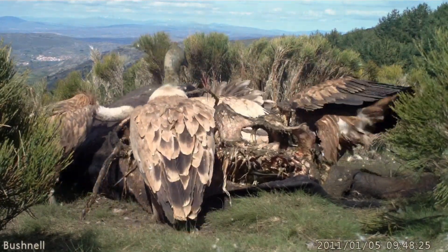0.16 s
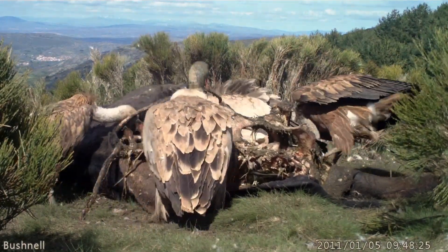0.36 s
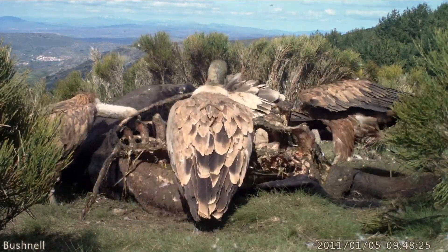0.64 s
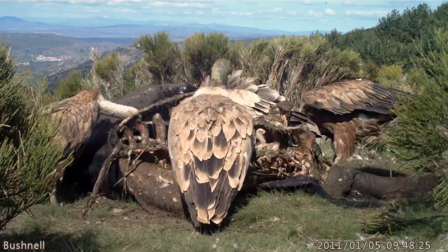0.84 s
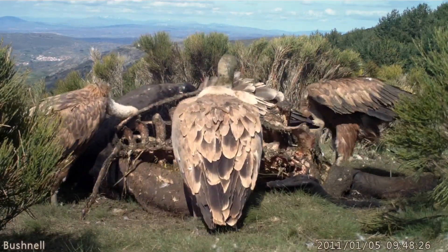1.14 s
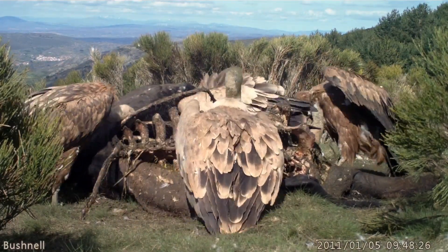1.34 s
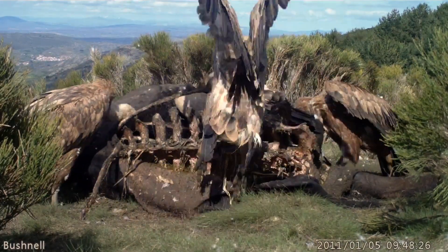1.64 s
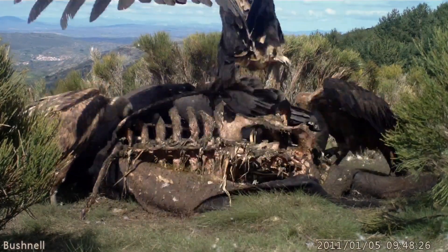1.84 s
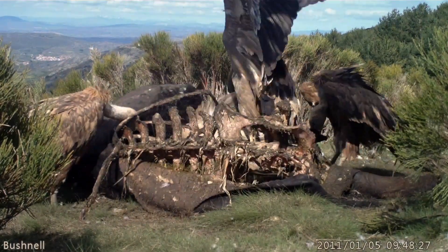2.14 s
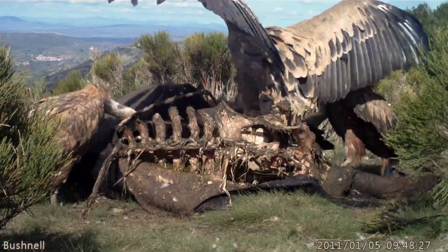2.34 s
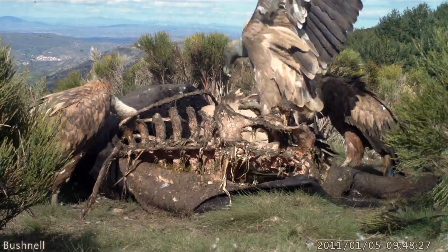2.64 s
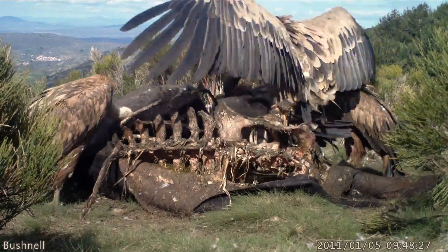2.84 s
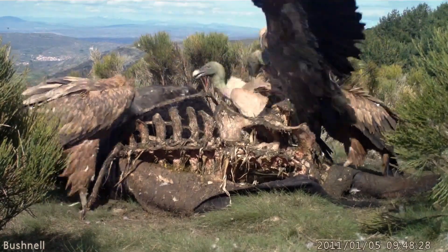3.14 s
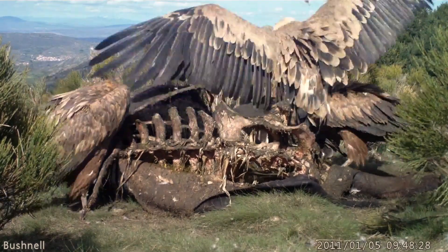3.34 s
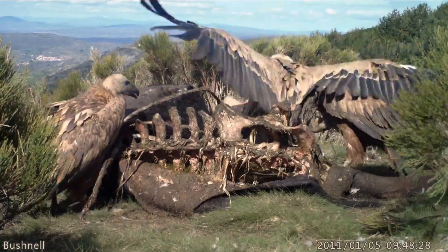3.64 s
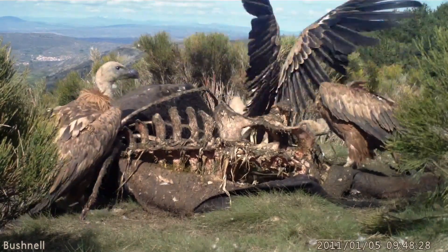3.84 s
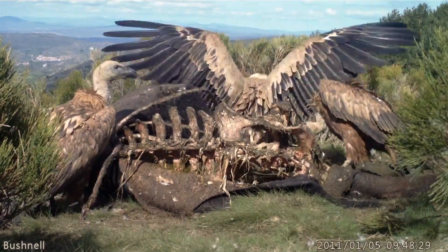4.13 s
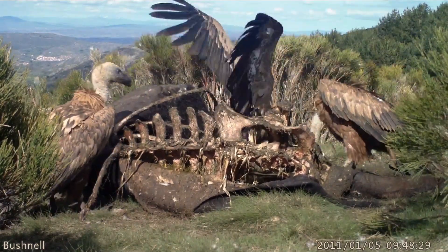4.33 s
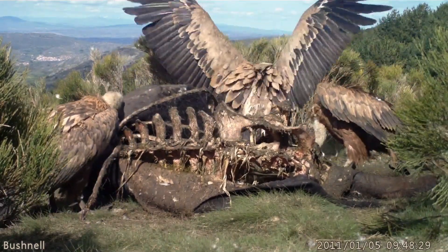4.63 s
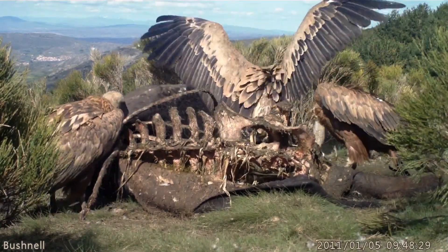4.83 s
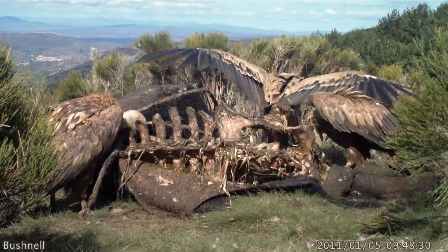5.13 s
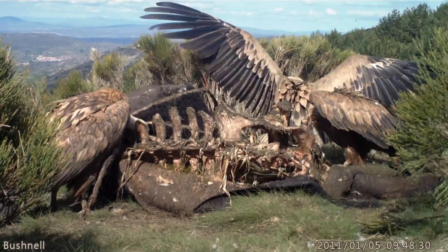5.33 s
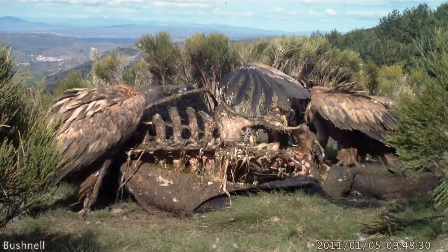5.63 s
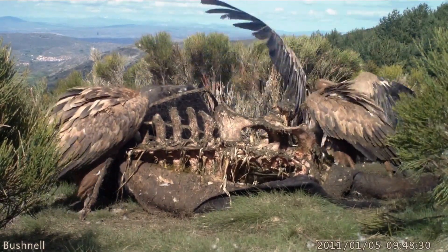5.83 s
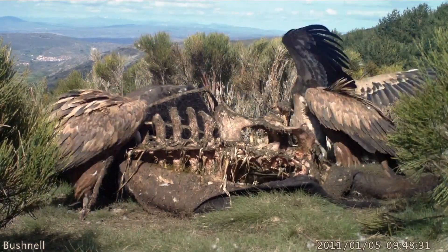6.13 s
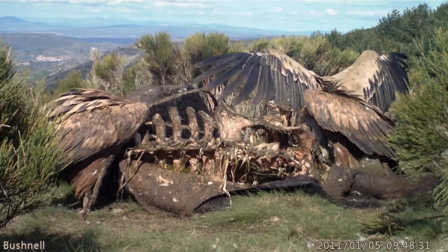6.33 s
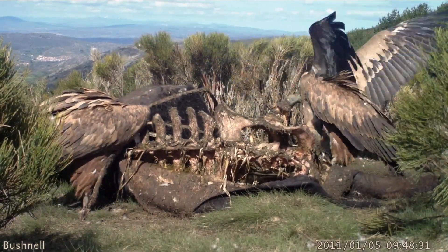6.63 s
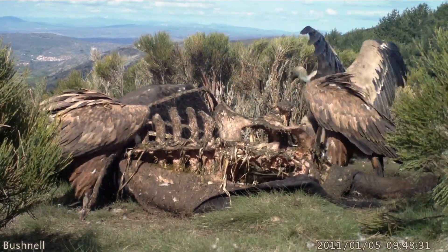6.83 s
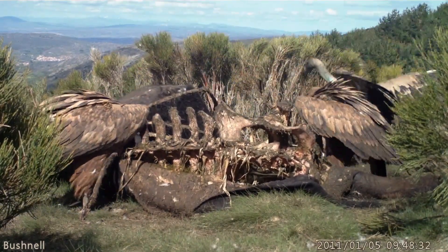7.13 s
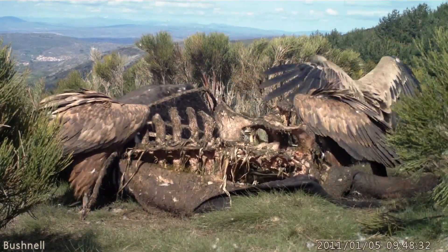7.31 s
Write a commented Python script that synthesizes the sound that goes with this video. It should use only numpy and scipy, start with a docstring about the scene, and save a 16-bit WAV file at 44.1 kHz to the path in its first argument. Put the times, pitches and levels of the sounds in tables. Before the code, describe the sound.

Large vultures quarrel at a carcass on a quiet open hillside. A long rattling hiss swells, turns into a wavering squeal and stops. Wing beats and a sharp snap follow, then a steady run of hoarse yelping cackles, loudest midway, fading and returning, ending with a drawn-out whine. Close, gritty low-quality microphone, birds only on the right; the left holds faint buzzing camera crackle.

```python
"""A long hiss tightens into a squeal, then runs of cackles break out among wing beats and sharp snaps.
Vultures squabble over a carcass on an open hillside, in front of a trail camera.
Breath noise and unsteady harmonics pass through throat, chest and beak filters to make the voices;
wings and ground are filtered noise, and snaps are short ringing tones with splintering noise.
The microphone feeds the right channel; the idle left one carries only the camera's electronics."""
import sys
import numpy as np
from scipy import signal
from scipy.fft import rfft, irfft, next_fast_len
from scipy.io import wavfile

SR = 44100
rng = np.random.default_rng(int(sys.argv[2]) if len(sys.argv) > 2 else 0)


def dump(signal):
    """Clip the signal to [-1, 1] and save it as 16-bit WAV at the path in sys.argv[1]."""
    limited = np.clip(np.atleast_2d(signal).T, -1, 1)
    pcm = np.round(limited * 32767).astype(np.int16)
    wavfile.write(sys.argv[1], SR, pcm)


N = 329427  # samples, about 7.5 s
TIME = np.arange(N) / SR  # seconds

# colour of the open beak, and of rustling feathers: [f/Hz, relative level/dB]
BEAK_COLOUR = [(2100, -24.5), (2700, 2), (3100, 8.5), (3380, 6), (3650, 6.5), (3950, 1.5), (4500, 3.5),
               (5000, -2), (5700, -14.5)]


def gain_of(db):
    """Turns decibels into an amplitude factor."""
    return 10 ** (np.asarray(db) / 20)


def evened(x):
    """Scales a sound to an average strength (rms) of 1."""
    return x / np.sqrt(np.mean(x ** 2) + 1e-20)


def add(mix, s, sound):
    """Mixes a sound in, starting at s seconds."""
    part = mix[max(round(s * SR), 0):][:len(sound)]
    part += sound[:len(part)]


def shaped(x, colour, hz=None, width=300, skirt=0.22):
    """Filters by a colour and, if hz is given, one resonance standing on a flat skirt; rms 1."""
    size = next_fast_len(len(x) + 1024)
    f = np.fft.rfftfreq(size, 1 / SR)
    at, db = np.transpose(colour)
    gain = gain_of(np.interp(np.log(f + 1), np.log(at), db))
    gain = gain / (1 + (f / at[-1] / 0.93) ** 8)  # fade above the last point
    gain = gain * f / (f + at[0] / 2)  # fade below the first point
    if hz is not None:
        gain = gain * (skirt + 1 / (1 + 2j * (f - hz) / width))
    return evened(irfft(rfft(x, size) * gain, size)[:len(x)])


def wobble(count, rate_hz):
    """Random drift: noise that keeps only changes slower than about rate_hz; rms 1."""
    size = next_fast_len(count + 8192)
    f = np.fft.rfftfreq(size, 1 / SR)
    slow = rfft(rng.standard_normal(size)) / (1 + (f / rate_hz) ** 4)
    return evened(irfft(slow, size))[:count]


def writes():
    """1 while the camera stores full buffers after a clock tick; two on one tick take twice as long."""
    # buffers filled at a steady pace: [first full t/s, filling time/s]
    buffers = [(0.15, 0.8 / 3), (0.246, 0.328)]
    clock_s, delay_s, write_s = 0.1, 0.0045, 0.0145
    # each filling time is rounded down to a clock tick
    full = [np.arange(first, N / SR, period) // clock_s for first, period in buffers]
    ticks = np.concatenate(full).astype(int)
    tick = (TIME // clock_s).astype(int)
    queued = np.bincount(ticks, minlength=tick[-1] + 1)[tick]
    since = TIME % clock_s - delay_s
    return (since > 0) * (since < queued * write_s)


def electronics(buzz_hz=708, frame_hz=30, crackle_db=-56, tick_db=-72, floor_db=-73, hum_db=-71,
                whine_db=-80):
    """Bursts of spiky buzz, a tick for every picture, and a thin floor of hiss, hum and whine."""
    # colour of crackle and ticks: [f/Hz, relative level/dB]
    crackle_colour = [(450, -59), (800, 10.5), (1400, 8.5), (5600, 8.5), (7500, 5.5), (10000, -4),
                      (12000, -80), (14500, 10), (16000, -38)]
    spikes = np.diff(np.floor(TIME * buzz_hz), prepend=0) * (1 + .5 * rng.standard_normal(N))
    grit = rng.standard_normal(N) * gain_of(3 * wobble(N, 1600))
    crackle = writes() * shaped(evened(spikes) + 0.69 * evened(grit), crackle_colour)

    since_frame = (TIME + .002) % (1 / frame_hz)
    tick_noise = grit * np.exp(-since_frame / 0.001) * gain_of(4 * wobble(N, 23.5))
    ticks = shaped(tick_noise, crackle_colour)

    floor_colour = [(60, 13.0), (500, 2.0), (2000, 10.5), (5000, 9.5), (9000, -2.5), (12000, -23)]
    floor = shaped(rng.standard_normal(N), floor_colour)
    hum = np.sin(2 * np.pi * 90 * TIME) + 0.75 * wobble(N, 130)
    high_tones = np.sin(2 * np.pi * 5185 * TIME) + 0.85 * np.sin(2 * np.pi * 6815 * TIME)
    high_tones = high_tones * (1 + .5 * wobble(N, 12))

    out = gain_of(crackle_db) * crackle + gain_of(tick_db) * ticks + gain_of(floor_db) * floor
    return out + gain_of(hum_db) * hum + gain_of(whine_db) * high_tones


def ground(air_db=-62, scuffle_db=-66, grain_db=5):
    """Quiet open air, and feet and feathers scuffling in dry grass: two coloured, uneven noises."""
    # colour of the open air: [f/Hz, relative level/dB]
    air_colour = [(30, 5), (90, 0.5), (250, -2), (600, -8.5), (1100, -10.5), (2000, -15), (3500, -8),
                  (5000, -6), (5800, -10)]
    air = shaped(rng.standard_normal(N), air_colour) * gain_of(wobble(N, 1.3))
    bustle_db = 3.5 * wobble(N, 3)
    grains = rng.standard_normal(N) * gain_of(grain_db * wobble(N, 270) + bustle_db)
    scuffle = shaped(grains, [(800, -23), (2200, -5.0), (3800, -10.5), (5500, -21)])
    return gain_of(air_db) * air + gain_of(scuffle_db) * scuffle


def hillside(x, t60=0.21, wet_db=-22):
    """Faint, short scatter from ground and bushes: sparse random echoes that fade 60 dB in t60 s."""
    t = np.arange(SR // 2) / SR
    sparse = (rng.random(len(t)) < .05) * (t > .004)
    taps = rng.standard_normal(len(t)) * sparse * gain_of(-60 * t / t60)
    return x + gain_of(wet_db) * signal.fftconvolve(x, taps / np.linalg.norm(taps))[:N]


def case(x, direct_db=-1.5):
    """The plastic camera case in front of the microphone adds a few narrow, ringing peaks."""
    # resonances of the case: [f/Hz, width/Hz, gain relative to the direct sound/dB]
    resonances = [(680, 58, -5), (1008, 42, -1), (1910, 310, -12.5), (2294, 79, -10), (2910, 54, -8.5),
                  (3710, 73, -5), (4210, 114, -5.5)]
    rings = sum(gain_of(db) * signal.lfilter(*signal.iirpeak(hz, hz / width, SR), x)
                for hz, width, db in resonances)
    return gain_of(direct_db) * (x + rings)


def wings():
    """Wing beats and footfalls push soft lumps of air, low noise; feathers rustle along with them."""
    # beats: [t at the peak/s, half length (fall to 37 %)/s, level/dB, f where the treble starts to fall/Hz]
    beats = [(1.395, 0.016, -52, 278), (1.529, 0.016, -52, 167), (1.993, .1, -62.5, 240),
             (2.26, 0.053, -62.5, 216), (2.327, 0.012, -49, 163), (2.485, 0.0098, -43, 394),
             (2.635, 0.011, -52.5, 410), (3.413, 0.028, -46, 370), (3.785, 0.028, -51, 240),
             (3.903, 0.023, -49.5, 169), (4.246, .022, -53.5, 194), (5.457, 0.084, -52.5, 158),
             (5.628, .07, -54.5, 151), (5.775, 0.015, -44.5, 169), (5.873, 0.027, -51, 130),
             (6.022, 0.059, -53.5, 130), (6.04, 0.015, -38.5, 130), (6.218, 0.043, -57.5, 120)]
    out, effort = np.zeros(N), np.zeros(N)
    for s, half, db, top_hz in beats:
        t = np.arange(-2 * half, 2 * half, 1 / SR)
        swell = gain_of(db) * np.exp(-(t / half) ** 2)
        colour = [(top_hz / 7, -3), (top_hz / 2.3, 0), (top_hz, -4), (top_hz * 2.55, -20), (top_hz * 5, -33)]
        add(out, s - 2 * half, swell * shaped(rng.standard_normal(len(t)), colour))
        add(effort, s - 2 * half, swell)
    feathers = shaped(rng.standard_normal(N) * gain_of(2.2 * wobble(N, 400)), BEAK_COLOUR)
    return out + gain_of(-28.0) * effort * feathers


def snap(db, ring_hz, t60, grit=1.0):
    """A dry crack of beak or bone: a cluster of short ringing tones and a little splintering noise."""
    # tones of a snap: [factor on ring_hz, relative level/dB]
    modes = [(.74, 4.5), (.86, 4), (1.03, 8), (1.19, -8.5), (1.38, -9)]
    t = np.arange(int(t60 * SR) + 200) / SR
    ring = sum((-1) ** k * gain_of(mode_db) * np.sin(2 * np.pi * factor * ring_hz * t)
               for k, (factor, mode_db) in enumerate(modes))
    splinter_colour = [(600, -25), (1500, -13), (2400, -16), (4300, 2), (5100, -6)]
    splinters = shaped(rng.standard_normal(len(t)), splinter_colour)
    onset = 1 - np.exp(-t / 0.00064)
    return (ring + grit * splinters) * gain_of(db - 60 * t / t60) * onset


def whistle(hz, width_hz):
    """Breath caught in a narrow resonance that follows a pitch curve; rms 1."""
    phase = 2 * np.pi * np.cumsum(hz) / SR
    return wobble(N, width_hz / 2) * np.cos(phase) + wobble(N, width_hz / 2) * np.sin(phase)


def hiss(flutter_db=1.88, throat_db=-7, beak_hz=2970, beak_ring_db=-8):
    """A long, rattling hiss: breath noise with drifting resonances; it gives way to the squeal."""
    # course of the hiss: [t/s, relative level/dB, relative beak level/dB, throat f/Hz]
    course = [(0.0, -52, -8, 1650), (0.36, -40.5, -5, 1770), (0.55, -44.5, -3.5, 1776),
              (0.6, -49, -7.5, 1750), (0.623, -44.5, -4, 1733), (1.052, -47, -1, 1660),
              (1.461, -45, -2, 1548), (1.535, -50.5, 2.5, 1766), (1.655, -42.5, 3.5, 1680)]
    # colour of its breath: [f/Hz, relative level/dB]
    colour = [(300, -22), (650, -19.5), (860, -14.5), (1030, -5), (1220, -7), (1500, 1.5), (1820, 1),
              (2020, -5.5), (2200, -1), (2780, -11.5), (2960, -6.5), (3350, -15.5), (4250, -15),
              (5400, -28)]
    # narrow resonances that wander inside it: [f/Hz, drift/Hz, width/Hz, relative level/dB]
    wandering = [(2270, 90, 140, -12), (4300, 60, 86, -22)]
    s, *columns = np.transpose(course)
    db, beak_db, throat_hz = (np.interp(TIME, s, c) for c in columns)

    breath = shaped(rng.standard_normal(N), colour)
    high_pass = signal.butter(4, 2750, "high", fs=SR, output="sos")
    bright = signal.sosfiltfilt(high_pass, breath)
    strain = np.interp(TIME, [.2, .42], [.2, 1])  # resonances grow stronger as the hiss gathers force
    throat_ring = whistle(throat_hz + 40 * wobble(N, 14.03), 120)
    throat = evened(breath - bright) + strain * gain_of(throat_db) * throat_ring
    beak_ring = whistle(beak_hz + 45 * wobble(N, 6.16), 110)
    beak = evened(bright) + strain * gain_of(beak_ring_db) * beak_ring
    rings = sum(gain_of(ring_db) * whistle(hz + drift * wobble(N, 7), width)
                for hz, drift, width, ring_db in wandering)

    level = gain_of(db + 3.0 + flutter_db * wobble(N, 160))
    out = (throat + beak * gain_of(beak_db - 0.5) + strain * rings) * level
    return out * np.interp(TIME, [1.58, 1.67], [1, 0])


def squeal(waver_hz=38):
    """A wavering whistle; overtones and half tones grow as the throat tightens, then it drops and stops."""
    # course of the squeal: [t/s, f/Hz, level/dB]
    course = [(1.3, 1459, -48), (1.44, 1482, -38.5), (1.52, 1724, -40), (1.58, 1767, -37),
              (1.631, 1760, -39.5), (1.655, 1594, -37), (1.672, 1450, -65)]
    s, hz, db = np.transpose(course)
    phase = 2 * np.pi * np.cumsum(np.interp(TIME, s, hz) + waver_hz * wobble(N, 180)) / SR
    strain = np.interp(TIME, [1.6, 1.655], [.2, 1])
    extra = np.sin(2 * phase) + 0.45 * np.sin(3 * phase / 2) + 0.09 * np.sin(phase / 2)
    tone = np.sin(phase) + strain * extra
    level = gain_of(np.interp(TIME, s, db, left=-200, right=-200))
    return tone * (0.94 + 0.47 * wobble(N, 110)) * level


def tract(drive, throat_hz, chest_db, beak_db, width):
    """A bird's airway: a throat resonance, a low chest part and the bright open beak."""
    # colours of chest and throat: [f/Hz, relative level/dB]
    chest_colour = [(250, -4), (450, -1), (630, -12), (800, 2.5), (1030, 2), (1250, -2.5), (1600, -4)]
    throat_colour = [(900, -62), (1250, -12), (1550, 2), (1900, 0.5), (2100, 0), (2300, 4), (2650, 3),
                     (3100, -10), (4000, -61)]
    throat = shaped(drive, throat_colour, throat_hz, width, skirt=0.18)
    chest = gain_of(chest_db) * shaped(drive, chest_colour)
    return throat + chest + gain_of(beak_db) * shaped(drive, BEAK_COLOUR)


def folds(hz, shimmer_db, count=10):
    """The voice's harmonics on a pitch curve, each swelling and sinking by itself; rms 1."""
    turns = np.cumsum(hz) / SR
    sizes = gain_of(shimmer_db * wobble(count * len(hz), 36)).reshape(count, -1)
    return evened(sum(np.cos(2 * np.pi * (k * turns + rng.random())) * size * k ** -.45
                      for k, size in enumerate(sizes, 1)))


def whine(throat_hz=1620, chest_db=-13, jitter=0.0156, breath=0.85):
    """One drawn-out, hoarse voice, harmonics plus breath, bends up and down among the last cackles."""
    # course of the whine: [t/s, f/Hz, relative level/dB, relative beak level/dB]
    course = [(6.705, 562, -42, 1), (6.745, 512, -41, -0.5), (6.776, 526.8, -41.5, 5.5),
              (6.798, 463.7, -55.5, 8), (6.836, 533, -47, -9), (6.875, 408.4, -49.5, 7.5),
              (6.915, 493.6, -49, -0.5), (6.942, 680, -41, 8), (6.974, 565, -43, -4),
              (6.997, 538, -41, -10), (7.025, 539, -65, -14), (7.053, 500, -50.5, 10),
              (7.084, 399.6, -53.5, -2.5), (7.1, 565, -46.5, -2), (7.122, 536, -43, 0),
              (7.152, 446, -60.5, 0), (7.192, 557, -45, -1), (7.226, 480, -47, 2)]
    s, *columns = np.transpose(course)
    t = np.arange(s[0], s[-1], 1 / SR)
    hz, db, beak_db = (np.interp(t, s, c) for c in columns)
    buzz = folds(hz * (1 + jitter * wobble(len(t), 210)), shimmer_db=4.0)
    drive = buzz + breath * rng.standard_normal(len(t))
    drive = drive * signal.windows.tukey(len(t), .04)
    return s[0], gain_of(db) * tract(drive, throat_hz, chest_db, beak_db, width=590)


def yelp(s, length, first_hz, middle_hz, last_hz, db, throat_hz, chest_db, beak_db, lead=.009, crest=0.33,
         jitter=0.014):
    """Breath and unsteady harmonics start together; the harmonics dip, then swell and fade on an arch of pitch."""
    # hoarseness as the quarrel goes on: [t/s, relative breath strength]
    hoarseness = [(2.3, .42), (2.85, .45), (3.1, .3), (3.4, .19), (3.95, .26), (4.3, .15), (5.2, .12),
                  (5.5, .26), (6.7, .26), (7.3, .24)]
    t = np.arange(-lead, length + lead, 1 / SR)
    count, u = len(t), t / length  # u runs from 0 to 1 through the yelp
    arch = np.polyfit([0, .5, 1], [first_hz, middle_hz, last_hz], 2)
    hz = np.polyval(arch, np.clip(u, 0, 1))
    turns = np.cumsum(hz * (1 + jitter * wobble(count, 220))) / SR

    shimmer = gain_of(2.8 * wobble(12 * count, 35)).reshape(-1, count)  # one row for each of 12 harmonics
    buzz = sum(np.cos(2 * np.pi * (k * turns + rng.random())) * size * k ** -.45
               for k, size in enumerate(shimmer, 1))
    swell_db = np.interp(u, [-.2, 0, .22, crest, .8, 1, 1.2], [-6, -12.5, 0.5, 7.5, 5.5, -2.5, -20])
    voiced = evened(buzz) * gain_of(swell_db)

    puffs = rng.standard_normal(count) * (1 + 0.66 * np.cos(2 * np.pi * turns))
    breath_db = np.interp(u, [-0.8, 1.16, 1.18, 2.0], [-3.5, 11.5, -2.5, 6.0])
    breath = 2 * np.interp(s, *np.transpose(hoarseness)) * puffs * gain_of(breath_db)
    drive = (voiced + breath) * signal.windows.tukey(count, .2)
    return s - lead, gain_of(db - 3.5) * tract(drive, throat_hz, chest_db, beak_db, width=210)


def rasp(rise, fall, db, throat_hz, chest_db, beak_db, start_db=-11, end_db=-17, flutter_db=1.5,
         torn_hz=540, jitter=0.12, voice_db=-7):
    """Fluttering breath and a torn voice whose pitch jumps about, through the same airway."""
    t = np.arange(int((rise + fall + 0.0076) * SR)) / SR
    torn = folds(torn_hz * (1 + jitter * wobble(len(t), 114.4)), shimmer_db=7)
    drive = rng.standard_normal(len(t)) + gain_of(voice_db) * torn
    drive = drive * gain_of(flutter_db * wobble(len(t), 215))
    swell = gain_of(np.interp(t, [0, rise, rise + fall], [start_db, 0, end_db]))
    swell = swell * signal.windows.tukey(len(t), .16)
    return gain_of(db + 2) * swell * tract(drive, throat_hz, chest_db, beak_db, width=390)


def manner(s, db):
    """The drifting voice at a moment and level: yelp length, chest dB, beak dB; effort thins the chest."""
    # drift through the quarrel: [t/s, yelp length/s, relative beak level/dB, chest level at usual effort/dB]
    drift = [(1.75, .036, 8.5, -23), (2.403, 0.038, -0.5, -11), (2.753, 0.028, -4, -15.5),
             (3.124, 0.037, 1.5, -9.5), (3.306, 0.04, -5, -16.5), (3.558, .032, -8, -17.5),
             (3.836, 0.033, -2.5, -14), (4.082, 0.037, -13, -16), (4.5, 0.041, -6.5, -17.5),
             (4.824, .05, -11, -21), (5.138, 0.054, -7, -10.5), (5.544, 0.03, -12, -21),
             (5.786, 0.037, 3, -27), (5.888, 0.032, -12.5, -25), (6.367, 0.035, -9, -23),
             (6.696, 0.039, 1, -18), (7.205, 0.026, -2, -33), (7.367, 0.027, 6, -16)]
    chest_lag, usual_db = 0.36, -40.5  # the chest loses chest_lag dB for each dB above usual_db
    at, *columns = np.transpose(drift)
    length, beak_db, chest_db = (np.interp(s, at, c) for c in columns)
    return length, chest_db - chest_lag * (db - usual_db), beak_db


def cackles():
    """Each cackle is an arched yelp that breaks into a rasp; a few rasps come alone."""
    # cackles: [t at mid-yelp/s, pitch f/Hz, relative yelp level/dB, yelp throat f/Hz,
    #           relative rasp level/dB, time from mid-yelp to the rasp's peak/s]
    calls = [(2.364, 682, -42.5, 2170, -46, 0.046), (2.473, 690, -39.5, 2340, -42, 0.045),
             (2.585, 700, -38.5, 2503, -40.5, 0.04), (2.701, 642, -37, 2380, -33.5, 0.045),
             (2.839, 665, -36, 2260, -36.5, 0.045), (2.979, 612, -35.5, 1720, -35.5, 0.04),
             (3.111, 637.5, -33.5, 1740, -35.5, 0.048), (3.248, 627.5, -26, 1920, -29.5, 0.041),
             (3.380, 604, -28, 2000, -28.5, 0.04), (3.517, 611, -32, 1980, -31, .039),
             (3.657, 571, -35, 1820, -33, 0.048), (3.809, 649, -40, 1740, -44, 0.044),
             (3.951, 624, -44.5, 1550, -42.5, 0.051), (4.080, 666, -39.5, 2000, -38.5, 0.051),
             (4.219, 626, -40.5, 1930, -42.5, 0.045), (4.364, 613, -41.5, 2100, -43.5, 0.042),
             (4.516, 544, -44.5, 1950, -47.5, 0.042), (4.667, 527, -44, 2100, -46.5, 0.04),
             (4.805, 511, -45.5, 2130, -49, 0.038), (4.977, 541, -48.5, 1840, -47.5, 0.037),
             (5.138, 528, -51, 2330, -52.5, .054), (5.517, 617, -47.5, 1920, -47.5, 0.046),
             (5.636, 660, -38, 1960, -36, 0.053), (5.76, 630, -39.5, 2000, -41.5, 0.048),
             (5.893, 586, -44, 1700, -51, 0.048), (6.029, 574, -50, 1580, -51.5, 0.053),
             (6.168, 593, -45.5, 1970, -44.5, .052), (6.309, 600, -41.5, 1780, -38.5, 0.057),
             (6.689, 639, -37.5, 1730, -41.5, 0.055), (6.818, 603, -37.5, 1620, -43, 0.044),
             (7.326, 671, -43, 1940, -42, 0.053)]
    # rasps with no yelp before them: [t/s, length/s, relative level/dB, throat f/Hz]
    lone_rasps = [(1.71, 0.096, -57.5, 2070), (2.017, 0.14, -61, 2360), (2.214, 0.061, -56, 2650),
                  (2.271, 0.068, -56, 2550), (2.766, 0.073, -48, 2480), (3.754, 0.075, -46, 2420),
                  (5.413, 0.059, -58.5, 1640), (5.565, 0.099, -44.5, 1840), (6.601, 0.051, -57, 1470),
                  (7.22, .052, -32.5, 2250)]
    # the arch of pitch, as shares of the middle pitch; yelps above usual_hz end higher
    yelp_start, yelp_end, end_rise_per_hz, usual_hz = 0.68, 0.95, 0.00054, 613
    # a rasp starts just before the yelp ends, with a slacker throat
    overlap_s, fall_share, slack, rasp_beak_db = 0.003, 0.78, 0.95, -0.54
    lone_rise = 0.39  # share of a lone rasp's length spent swelling

    out = np.zeros(N)
    for s, hz, yelp_db, throat_hz, rasp_db, delay in calls:
        length, chest_db, beak_db = manner(s, yelp_db)
        first_hz = yelp_start * hz
        last_hz = hz * (yelp_end + end_rise_per_hz * (hz - usual_hz))
        add(out, *yelp(s - length / 2, length, first_hz, hz, last_hz, yelp_db, throat_hz, chest_db, beak_db))
        start, peak = s + length / 2 - overlap_s, s + delay
        _, chest_db, beak_db = manner(peak, rasp_db)
        add(out, start, rasp(peak - start, fall_share * delay, rasp_db, slack * throat_hz, chest_db,
                             beak_db + rasp_beak_db))
    for s, length, db, throat_hz in lone_rasps:
        _, chest_db, beak_db = manner(s, db)
        rise, fall = lone_rise * length, (1 - lone_rise) * length
        add(out, s, rasp(rise, fall, db, throat_hz, chest_db, beak_db))
    return out


def scene():
    """The electronics alone on the left channel, the birds and their surroundings on the right."""
    # snaps of beak and bone: [t/s, relative level/dB, base ring f/Hz, time to fade by 60 dB/s]
    snaps = [(1.823, -41, 3340, 0.01), (1.8379, -26, 3230, 0.011), (1.972, -57, 3120, 0.035),
             (2.036, -49.5, 3220, 0.022), (3.3988, -22, 4380, 0.012), (3.795, -37, 3410, 0.063),
             (4.132, -41, 3410, 0.042), (7.016, -33, 3560, 0.0097), (7.0237, -46, 3230, 0.01),
             (7.035, -48, 3150, 0.0176)]
    birds = hiss() + squeal() + cackles()
    add(birds, *whine())
    for s, *row in snaps:
        add(birds, s, snap(*row))
    return np.array([electronics(), case(hillside(birds) + wings() + ground())])


def record(dry, offset=.0592, converter_hz=12000, edge_hz=15700):
    """The converter holds each slow sample, mirroring sound into the treble; the idle input sits off zero."""
    slow = signal.resample(dry[1], round(N * converter_hz / SR))
    held = signal.resample(np.repeat(slow, 4), N)
    low_pass = signal.firwin(255, edge_hz, window=("kaiser", 9), fs=SR)
    return signal.oaconvolve(np.array([dry[0], held]), low_pass[None], "same") + [[offset], [0]]


dry = scene()
out = record(dry)
dump(out)
```